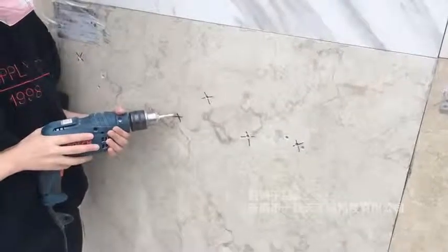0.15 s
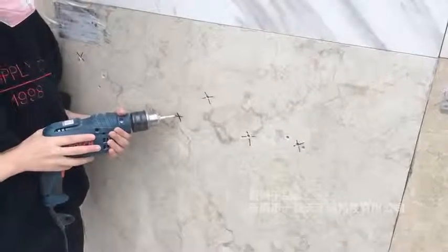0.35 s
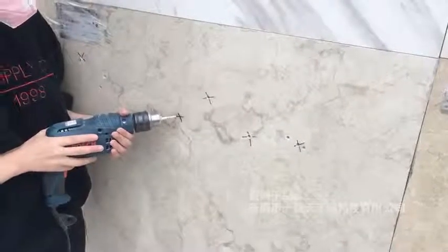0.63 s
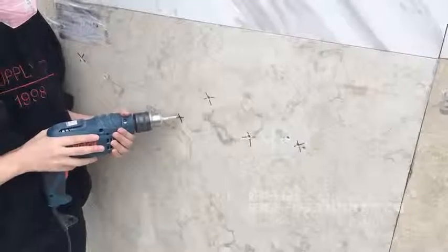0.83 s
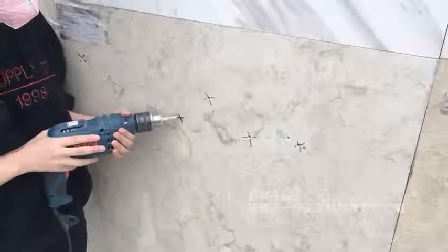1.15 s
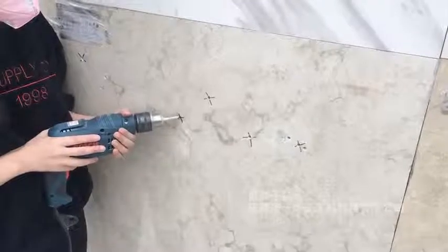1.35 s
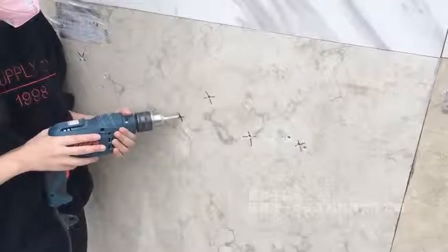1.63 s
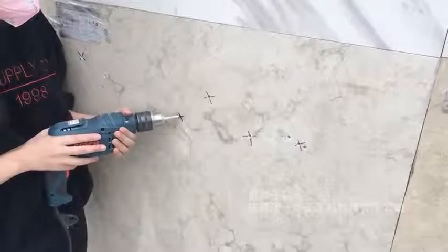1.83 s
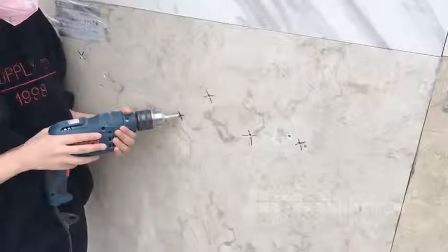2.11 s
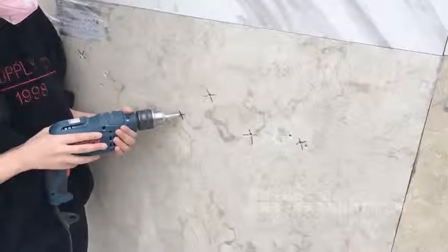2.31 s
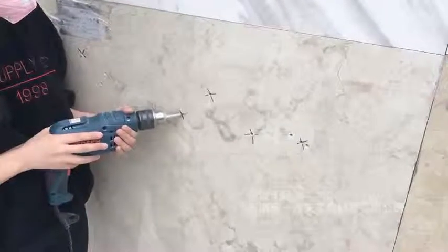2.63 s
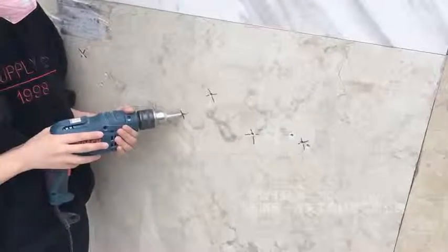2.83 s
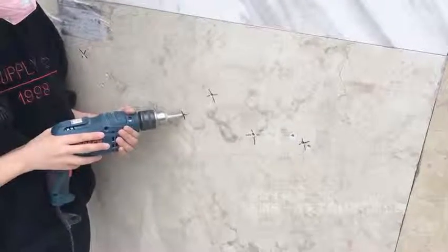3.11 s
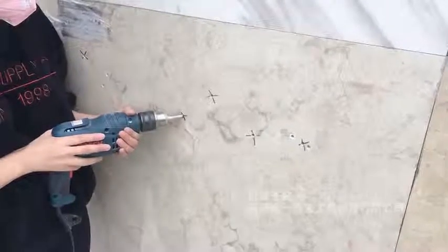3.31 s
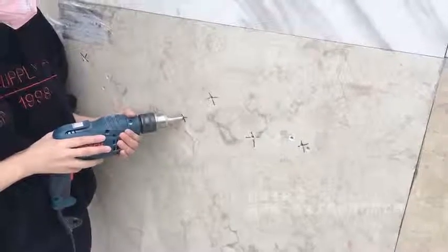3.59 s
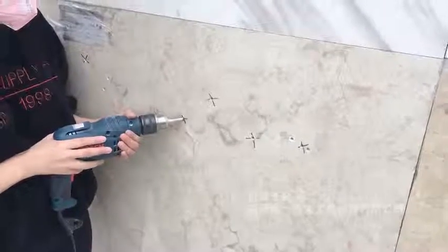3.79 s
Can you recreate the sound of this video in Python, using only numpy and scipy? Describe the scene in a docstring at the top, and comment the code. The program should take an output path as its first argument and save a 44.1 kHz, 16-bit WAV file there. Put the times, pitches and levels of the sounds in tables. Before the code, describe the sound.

An electric drill grinds into ceramic tile throughout the four seconds, with a gritty hiss over its motor whine and fan air, in a bare room. The grinding eases around 0.3 seconds, builds from 1 second, and gains a high ring from about 2.5. The bit squeaks briefly near 1.9 and 3.2 seconds. Soft low thumps buffet the microphone, mostly at 1 to 1.3 and 2.3 to 2.7 seconds.

```python
"""A corded drill runs at full speed with its bit pressed on a glazed tile, in a bare room.
Grit breaks under the turning bit, rings the tile and hisses, harder as the bit bites,
until the bit itself starts to ring. Twice the bit catches and squeaks.
Behind this the motor whines and blows air, and soft low thumps buffet the microphone."""
import sys
import numpy as np
from scipy import signal
from scipy.fft import rfft, irfft
from scipy.io import wavfile
from scipy.ndimage import uniform_filter1d

SR = 44100
rng = np.random.default_rng(int(sys.argv[2]) if len(sys.argv) > 2 else 0)


def dump(signal):
    """Clip the signal to [-1, 1] and save it as 16-bit WAV at the path in sys.argv[1]."""
    limited = np.clip(np.atleast_2d(signal).T, -1, 1)
    pcm = np.round(limited * 32767).astype(np.int16)
    wavfile.write(sys.argv[1], SR, pcm)


N = 174195
T = np.arange(N) / SR
FREQS = np.maximum(np.fft.rfftfreq(N, 1 / SR), 1)


def gain(db):
    """Turn decibels into a factor to multiply by."""
    return 10 ** (np.asarray(db) / 20)


def unit(x):
    """Scale a signal to an average power of 1."""
    return x / np.sqrt(np.mean(x ** 2))


def fade(rows):
    """A gain that moves through rows of t/s, level/dB."""
    return gain(np.interp(T, *np.array(rows).T))


def colour(x, rows):
    """Shape the tone with rows of f/Hz, level/dB."""
    hz, db = np.array(rows).T
    return irfft(rfft(x) * gain(np.interp(np.log(FREQS), np.log(hz), db)), N)


def resonance(x, hz, width_hz):
    """Let one pitch ring through and weaken the rest."""
    return irfft(rfft(x) / (1 + 1j * (FREQS ** 2 - hz ** 2) / (FREQS * width_hz)), N)


def wander(per_s):
    """A smooth random wobble, about 1 in size."""
    step = int(SR / per_s)
    stairs = np.repeat(rng.standard_normal(N // step + 2), step)
    return unit(uniform_filter1d(stairs, step)[:N])


def room(x, fade_s=0.39, echo_db=-13):
    """Bare walls add a short wash of echo that falls 60 dB in fade_s."""
    age = T[:SR // 4]
    tail = rng.standard_normal((2, len(age))) * gain(-60 * age / fade_s) * (age > .003)
    tail *= gain(echo_db) / np.sqrt(np.sum(tail ** 2) / 2)
    echo = signal.fftconvolve(x, tail, axes=1)[:, :N]
    return (x + echo) / np.hypot(1, gain(echo_db))


def treble_flicker(x, band_hz=900, depth_db=1.7):
    """Each band of the treble flutters on its own, the higher ones more."""
    spectrum, band = rfft(x), np.minimum(FREQS // band_hz, 15)
    return sum(irfft(spectrum * (band == k), N) * gain(min(k / 10, 1) * depth_db * wander(36))
               for k in np.unique(band))


def buffets(rise_s=0.0056, sag_s=0.0064):
    """Soft pressure thumps hit the microphone over a low rumble."""
    # tone of the rumble: f/Hz, level/dB
    rumble_tone = [(20, -28), (35, -18), (48, -2.5), (62, 0), (85, -2), (125, -13.5), (200, -24),
                   (400, -28)]
    # its loudness: t/s, level/dB
    rumble_level = [(0, -58), (.25, -54), (.85, -55.5), (1.15, -33.5), (1.5, -49.5), (2.2, -53),
                    (2.7, -44.5), (3.1, -52.5), (3.95, -48)]
    # thumps: t/s, level/dB, f/Hz
    thumps = [(0.504, -37.5, 146), (0.611, -33.5, 110), (.73, -42, 110), (1.0, -27.5, 76),
              (1.004, -30, 176), (1.078, -38, 75), (1.106, -30, 84), (1.131, -25, 70), (1.179, -33, 62),
              (1.245, -21.5, 91), (1.282, -32, 79), (1.301, -33, 75), (1.406, -40, 69.6), (1.836, -39, 70),
              (2.344, -24, 74.5), (2.402, -35, 105), (2.639, -43, 70), (2.689, -28, 72)]
    out = unit(colour(rng.standard_normal(N), rumble_tone)) * fade(rumble_level)
    for at, db, hz in thumps:
        age = np.maximum(T - at, 0)
        # the pitch sags from 1.77 to 0.77 times hz
        cycles = hz * (0.77 * age + sag_s * (1 - np.exp(-age / sag_s)))
        swell = age / rise_s * np.exp(1 - age / rise_s)
        out += gain(db) * swell * np.sin(2 * np.pi * cycles)
    return out


def motor(speed, shaft_hz=469.5):
    """The spinning shaft whines and its cooling fan blows air."""
    # whine: multiple of the shaft rate, level/dB
    whine = [(1, -54.5), (2, -56.5), (3, -46), (6, -52)]
    # tone of the fan air: f/Hz, level/dB
    air_tone = [(100, -31), (220, -11), (380, -10), (530, -9.5), (620, -3), (830, -6.5), (1180, 1),
                (1950, 1.5), (2250, -2), (2700, 0), (4300, -3), (5700, -3.5), (6600, -3.5), (7600, -8.5),
                (10500, -10.5), (12000, -7.5), (16000, -10)]
    # its loudness: t/s, level/dB
    air_level = [(0, -27), (.16, -28), (.27, -29.5), (.7, -30), (1.2, -30), (1.8, -27.5), (2.4, -26.5),
                 (3.0, -25), (3.5, -26), (3.95, -27.5)]
    angle = 2 * np.pi * np.cumsum(shaft_hz * speed) / SR
    out = unit(colour(rng.standard_normal((2, N)), air_tone)) * fade(air_level)
    out[0] += np.sqrt(2) * sum(gain(db + 2 * wander(24.67)) * np.sin(k * angle) for k, db in whine)
    return out


def squeaks(waver_hz=135):
    """The bit squeaks briefly as it sticks and slips."""
    # catches of the bit: t/s, length/s, f/Hz, level/dB
    catches = [(1.855, 0.015, 1630, -21), (3.175, .03, 6400, -31)]
    out = np.zeros((2, N))
    for at, length, hz, db in catches:
        angle = 2 * np.pi * np.cumsum(hz + waver_hz * wander(300)) / SR
        out[0] += gain(db) * np.sin(angle) * np.exp(-(2 * (T - at) / length) ** 2)
    return out


def grit(cracks_per_s=22000, spread_db=10):
    """Breaking grit makes a dense stream of tiny, uneven clicks."""
    clicks = (rng.random((2, N)) < cracks_per_s / SR) * rng.choice([-1, 1], (2, N))
    return unit(clicks * gain(spread_db * rng.random((2, N))))


def ring(pitches, contact):
    """Grit strikes a solid and rings each of its pitches with wavering strength."""
    out = np.zeros((2, N))
    for hz, width, db in pitches:
        strength = gain(db + 0.7 * wander(23.98))
        ringing = resonance(grit() * contact, hz, width)
        out += strength * resonance(ringing, hz, 4 * width)  # cuts far-off pitches further
    return unit(out)


def grinding(speed, spindle_hz=44.1):
    """The turning bit crushes grit, which rings the tile and the bit, and hisses."""
    # ringing pitches of the tile: f/Hz, width/Hz, relative level/dB
    tile_pitches = [(937, 99, -11.5), (1374, 147, -7.5), (1592, 92, 0.5), (1744, 220, -3),
                    (1924, 180, -12.5), (3180, 140, -6.5), (3646, 420, -10), (4200, 85, -9.5),
                    (4520, 200, -13), (5270, 260, -14), (6430, 730, -15), (8640, 77, -18.5)]
    # how hard the bit bites the tile: t/s, level/dB
    bite = [(0, -31), (.3, -35.5), (.78, -34), (.92, -31), (1.5, -30), (2.1, -29.5), (2.45, -26.5),
            (2.8, -28), (3.08, -26), (3.3, -28), (3.6, -28.5), (3.95, -28)]
    # ringing pitches of the bit: f/Hz, width/Hz, relative level/dB
    bit_pitches = [(2846, 66, 2.5), (2957, 240, 1), (3060, 740, -8.5), (3720, 240, -6)]
    # their loudness: t/s, level/dB
    bit_level = [(0, -45), (2.0, -44), (2.65, -35), (3.0, -33), (3.35, -33), (3.95, -35)]
    # hiss of powdered glaze: f/Hz, level/dB
    hiss_tone = [(3500, -8.5), (5000, -16), (5700, -4), (6600, 9.5), (7700, 0), (8860, 6), (9500, 3.5),
                 (10700, -2.5), (11650, 3), (13200, 7), (16000, -25)]
    # its loudness: t/s, level/dB
    hiss_level = [(0, -35.5), (.3, -49), (.7, -41), (1.22, -40.5), (1.37, -34), (1.8, -36), (2.1, -33.5),
                  (2.6, -32), (3.13, -30.5), (3.4, -37.5), (3.75, -51), (3.95, -33)]
    turn = np.sin(2 * np.pi * np.cumsum(spindle_hz * speed) / SR)
    contact = (1 + .05 * turn) * gain(0.38 * wander(32))  # swells once a turn and wobbles
    hiss = unit(colour(grit() * contact, hiss_tone)) * gain(.7 * wander(32))
    tile = ring(tile_pitches, contact) * fade(bite)
    bit = ring(bit_pitches, contact) * fade(bit_level)
    return tile + bit + hiss * fade(hiss_level)


def scene():
    """The drill is straight ahead; only its treble spreads to the sides."""
    # stereo width, as a filter on the side signal: f/Hz, level/dB
    width = [(100, -64), (4000, -74), (4300, -49), (5400, -21), (6000, -13.5), (8200, -5.5), (12000, -5.5),
             (14000, -7.5)]
    speed = 1 + .009 * wander(12)
    drill = room(motor(speed) + grinding(speed))
    middle, side = treble_flicker(drill) + squeaks()  # row 0 is the middle, row 1 the side
    middle, side = middle + buffets(), colour(side, width)
    return np.array([middle + side, middle - side])


def record(dry, top_hz=14280):
    """Cut off the very highest treble steeply."""
    return irfft(rfft(dry) / np.sqrt(1 + (FREQS / top_hz) ** 500), N)


dry = scene()
out = record(dry)
dump(out)
```